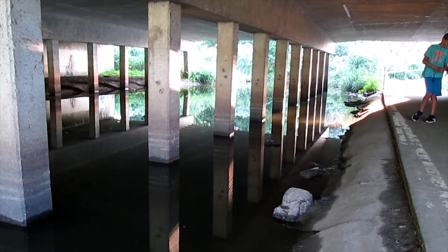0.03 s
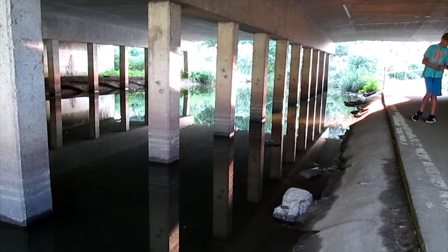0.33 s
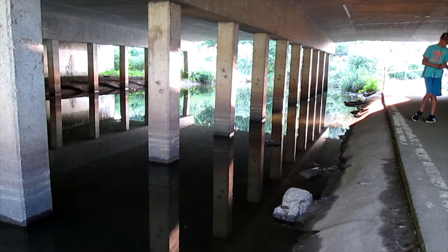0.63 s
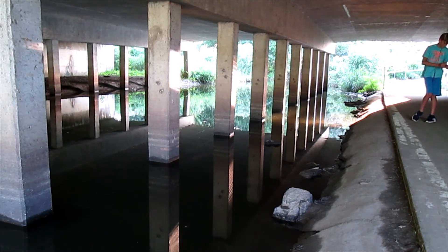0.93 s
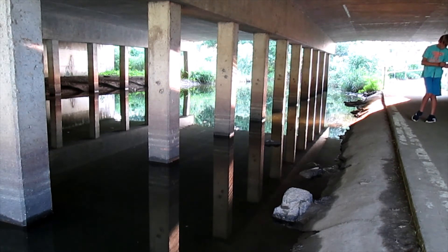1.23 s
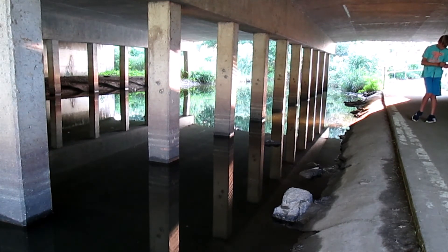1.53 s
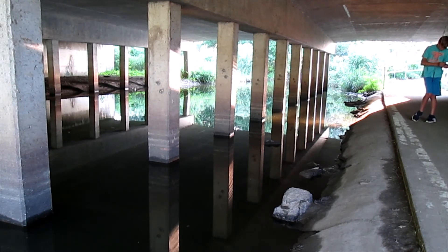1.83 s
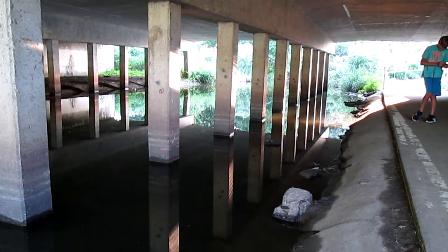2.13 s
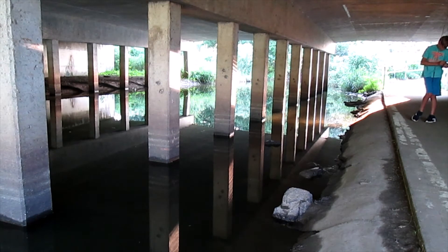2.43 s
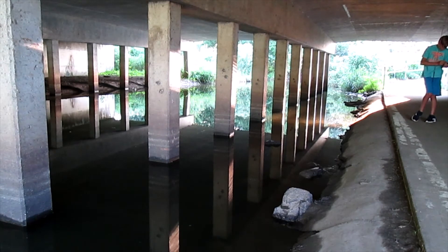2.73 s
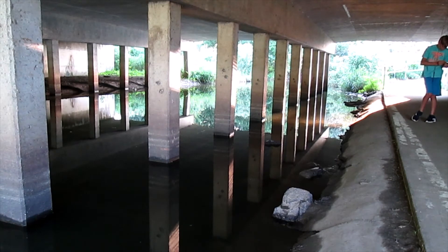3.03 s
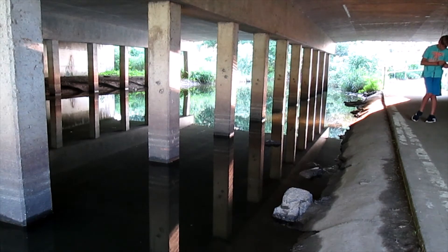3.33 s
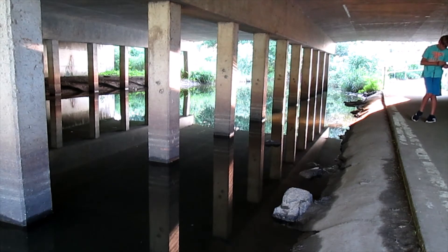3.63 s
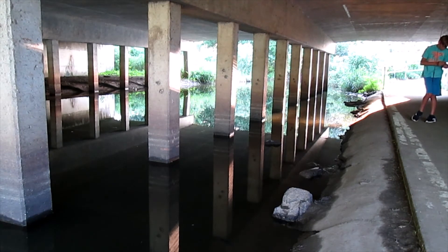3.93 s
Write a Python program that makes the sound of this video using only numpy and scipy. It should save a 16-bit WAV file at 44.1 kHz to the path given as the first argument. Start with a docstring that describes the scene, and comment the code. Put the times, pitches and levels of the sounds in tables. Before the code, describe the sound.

Road traffic rumbles across a low concrete bridge, heard from underneath. The deck booms as vehicles cross and wheels thump dully. Tyre roar peaks about halfway, then falls away over a steady wash of farther traffic.

```python
"""Road traffic crosses a low concrete bridge, heard from underneath beside still water.
From the start, wheels shake the deck into a rumble and tyre roar comes in from the open sides,
over a steady wash of farther traffic and a thin high whine. A tread sings briefly early on.
Booming tones swell as vehicles cross; dull thumps join from 1.2 s. The roar peaks just after 2 s,
then falls away. Three faint ticks follow after 3 s, and a last thump near the end."""
import sys
import numpy as np
from scipy import signal
from scipy.fft import rfft, irfft
from scipy.io import wavfile

SR = 44100
rng = np.random.default_rng(int(sys.argv[2]) if len(sys.argv) > 2 else 0)


def store_wav(level_fs):
    """Save 16-bit WAV to argv[1]."""
    pcm = np.round(np.clip(np.atleast_2d(level_fs), -1, 1) * 32767)
    wavfile.write(sys.argv[1], SR, pcm.T.astype(np.int16))


N = 176400
TIME_S = np.arange(N) / SR
FREQ_HZ = np.arange(N // 2 + 1) * SR / N


def undb(db):
    """Decibels to gain."""
    return 10 ** (np.asarray(db) / 20)


def unit(x):
    """Scale to rms 1."""
    return x / np.sqrt(np.mean(x ** 2) + 1e-18)


def envelope(rows):
    """Gain over time from (s, dB) points."""
    return undb(np.interp(TIME_S, *np.array(rows).T))


def filtered_noise(gain):
    """Noise of rms 1, shaped by a gain per frequency bin."""
    return unit(irfft(rfft(rng.standard_normal(N)) * gain, N))


def drift(rate_hz):
    """Smooth random motion of rms 1, mostly slower than rate_hz."""
    return filtered_noise(np.exp(-(FREQ_HZ / rate_hz) ** 2) * (FREQ_HZ > 0))


def noise(spectrum):
    """Noise of rms 1 from (Hz, dB) points, rolled off beyond both ends."""
    hz, db = np.array(spectrum).T
    f = np.maximum(FREQ_HZ, 1)
    gain = undb(np.interp(np.log(f), np.log(hz), db))
    rolloff = (np.minimum(f / hz[0], 1) * np.minimum(hz[-1] / f, 1)) ** 2
    return filtered_noise(gain * rolloff)


def narrow_noise(hz, half_width_hz):
    """Noise of rms 1 in one resonance."""
    return filtered_noise(1 / (1 + ((FREQ_HZ - hz) / half_width_hz) ** 2))


def wavering_tone(hz, waver_hz, flutter_db, rate_hz):
    """Tone of rms 1 whose pitch and level stray at random."""
    cycles = np.cumsum(hz + waver_hz * drift(rate_hz)) / SR + rng.random()
    return unit(np.sin(2 * np.pi * cycles) * undb(flutter_db * drift(rate_hz)))


def unsteady(x, bands=9):
    """Octave bands swell together and flicker alone, the treble least."""
    octave = np.log2(np.maximum(FREQ_HZ, 1) / 40)
    spectrum, out = rfft(x), 0
    swell = 0.1 * drift(rate_hz=7.5)
    for k in range(bands):
        band = irfft(spectrum * np.interp(octave, np.arange(bands), np.eye(bands)[k]), N)
        flicker = 0.3 * drift(rate_hz=36)
        depth = 3.5 - k / bands
        out += band * undb((swell + flicker) * depth)
    return out


# Each row: frequency in Hz, relative spectral density in dB.
SPAN_SPECTRUM = [(14, -1), (28, -7), (48, -2), (63, -0.5), (78, -1.5), (92, -4.5), (108, -1.5),
                 (150, -21.5), (300, -41.5)]
DECK_SPECTRUM = [(70, -8), (105, -19.5), (122, -5.5), (150, 0.5), (185, -4.5), (213, -1.5), (245, -9),
                 (295, -11.5), (450, -14.5), (900, -39.5)]
# Each row: time in seconds, gain in dB.
SPAN_ENVELOPE = [(0, 0.5), (.12, -0.5), (.4, -2.5), (.75, 2.5), (1.0, -1.5), (1.3, 1.5), (1.75, 0),
                 (2.2, 0.5), (2.7, -4), (3.2, -1), (3.7, -3.5), (3.92, -2)]
DECK_ENVELOPE = [(0, -3), (.35, -1), (.8, -1.5), (1.3, -1), (1.6, -1), (2.15, 2), (2.6, -1), (3.0, -4.5),
                 (3.5, -7.5), (3.9, -5)]

def deck_rumble(span_gain_db=-28.5, deck_gain_db=-25):
    """Rolling wheels shake the whole span and keep the concrete deck rumbling."""
    shake = noise(SPAN_SPECTRUM) * envelope(SPAN_ENVELOPE) * undb(span_gain_db)
    rumble = noise(DECK_SPECTRUM) * envelope(DECK_ENVELOPE) * undb(deck_gain_db)
    return unsteady(shake + rumble)


# Each row: middle in seconds, length in seconds, pitch in Hz, level in dB.
BOOMS = [(0.052, 0.36, 176.8, -25.5), (0.39, 0.45, 137, -32), (0.695, 0.44, 150.2, -28),
         (1.061, 0.16, 150, -24), (1.227, 0.087, 151, -22), (1.57, 0.17, 150, -32),
         (1.75, 0.12, 147, -26.5), (1.55, 0.65, 206.8, -31.5), (2.097, 0.22, 213, -30.5),
         (2.502, 0.3, 216, -30.5), (2.789, 0.27, 253.4, -31), (2.775, 0.16, 211, -35),
         (3.084, 0.2, 212.8, -29), (3.804, 0.28, 177, -35.5)]

def deck_booms():
    """The deck booms under crossing vehicles: low tones that swell and fade."""
    out = 0
    for middle_s, length_s, hz, db in BOOMS:
        swell = np.exp(-(2 * np.abs(TIME_S - middle_s) / length_s) ** 3)
        out += undb(db) * swell * wavering_tone(hz, waver_hz=2, flutter_db=1.2, rate_hz=18.5)
    return out


# Each row: start in seconds, relative level in dB, pitch of the blow in Hz, share of full ring time.
THUMPS = [(1.204, -19, 190, 0.78), (2.117, -24, 80, .7), (2.346, -16.5, 215, 0.59), (2.496, -19, 160, 0.33),
          (2.789, -18.5, 192, 0.94), (3.88, -18, 100, 1)]
# Each row: frequency in Hz, relative level in dB, full ring time (t60) in seconds.
DECK_MODES = [(63.6, -2, .16), (93.4, -14, 0.13), (113, 3, 0.17), (153, 4, 0.19), (206.6, 6.5, 0.26),
              (256, 0.5, 0.14), (358, -5, 0.096), (437, -6, .1), (440, -13, 0.041)]

def wheel_thumps(attack_s=0.015, spread_octaves=0.55):
    """A tyre hits an uneven spot; the soft blow rings the deck modes nearest its pitch most."""
    out = 0
    for start_s, db, blow_hz, ring_share in THUMPS:
        age_s = np.maximum(TIME_S - start_s, 0)
        decay_s = np.maximum(age_s - attack_s, 0)
        ring = 0
        for hz, mode_db, t60_s in DECK_MODES:
            drive = np.exp(-(np.log2(hz / blow_hz) / spread_octaves) ** 2)
            fade = undb(mode_db - 60 * decay_s / (t60_s * ring_share))
            ring += drive * fade * np.sin(2 * np.pi * (hz * age_s + rng.random()))
        attack = np.minimum(age_s / attack_s, 1)
        out += undb(db) * attack * ring / 2
    return out


# Each row: frequency in Hz, relative spectral density in dB.
HISS_SPECTRUM = [(1500, 0.5), (3000, 3.5), (4200, -6), (7000, -19)]
ROAR_SPECTRUM = [(120, -24), (250, 0), (310, -12.5), (352, 4), (390, -3), (455, -0.5), (560, -1.5),
                 (630, -7), (720, -2.5), (920, -4.5), (1250, -10.5), (2000, -22.5), (4000, -35.5),
                 (6000, -42.5), (8000, -49.5), (15000, -70)]
WASH_SPECTRUM = [(100, -15), (220, -1), (310, -6), (352, -0.5), (420, -8), (560, 1), (680, 1), (890, 3.5),
                 (1250, -3), (1600, -5), (2200, -10.5), (3200, -19), (4500, -26.5), (5800, -29),
                 (6400, -32.5), (7100, -30), (7850, -38.5), (8300, -38.5), (9500, -43), (11300, -48),
                 (15500, -62)]
# Each row: time in seconds, gain in dB.
HISS_ENVELOPE = [(0, -6), (.9, 0), (1.8, -2), (2.7, -19)]
ROAR_ENVELOPE = [(0, -3), (.45, -2), (1.0, -2), (1.5, -1.5), (1.85, 0.5), (2.15, 1), (2.38, 1), (2.65, -4),
                 (3.1, -11), (3.45, -15.5), (4, -12.5)]

def tyre_noise(hiss_gain_db=-49.5, roar_gain_db=-27.5, wash_gain_db=-31):
    """Tyres hiss on approach and roar overhead; farther traffic blends into a steady wash."""
    hiss = noise(HISS_SPECTRUM) * envelope(HISS_ENVELOPE) * undb(hiss_gain_db)
    roar = noise(ROAR_SPECTRUM) * envelope(ROAR_ENVELOPE) * undb(roar_gain_db)
    wash = noise(WASH_SPECTRUM) * undb(wash_gain_db)
    return unsteady(hiss + roar + wash)


# Each row: time in seconds, pitch in Hz.
TREAD_PITCH = [(.25, 905), (.72, 875), (1.3, 919)]
# Each row: time in seconds, level in dB.
TREAD_ENVELOPE = [(0, -39), (.17, -58), (.22, -30), (.27, -38.5), (.32, -30.5), (.39, -40.5), (.5, -40.5),
                  (.7, -37), (.82, -50), (1.5, -38), (2.7, -60)]

def tread_note():
    """A tyre tread sings a rough note that sags and rises with wheel speed."""
    hz = np.interp(TIME_S, *np.array(TREAD_PITCH).T)
    return wavering_tone(hz, waver_hz=9, flutter_db=2, rate_hz=47) * envelope(TREAD_ENVELOPE)


# Each row: centre in Hz, half-width in Hz, level in dB.
WHINE_BANDS = [(7315, 57, -61.5), (7476, 110, -63)]

def whine():
    """Steady, hissy whine: narrow noise bands high in the treble."""
    return sum(undb(db) * narrow_noise(hz, half_width_hz) for hz, half_width_hz, db in WHINE_BANDS)


# Each row: start in seconds, level in dB, centre in Hz, half-width in Hz, t60 in seconds.
TICKS = [(3.205, -65, 11300, 400, .05), (3.466, -58, 11000, 1600, .025), (3.664, -62, 12000, 300, .06)]

def ticks():
    """Faint, high noise bursts that die at once."""
    out = 0
    for start_s, db, hz, half_width_hz, t60_s in TICKS:
        age_s = np.maximum(TIME_S - start_s, 0)
        fade = undb(db - 60 * age_s / t60_s) * (TIME_S >= start_s)
        out += fade * narrow_noise(hz, half_width_hz)
    return out


def scene():
    """Mono sum at one microphone under the bridge."""
    bridge = deck_rumble() + deck_booms() + wheel_thumps()
    return (bridge + tyre_noise() + tread_note() + whine() + ticks())[None, :]


def record(dry):
    """The recorder cuts the top treble with a steep low-pass."""
    cutoff_hz = 15700
    return signal.sosfilt(signal.ellip(8, .1, 70, cutoff_hz, fs=SR, output="sos"), dry)


dry = scene()
out = record(dry)
store_wav(out)
```